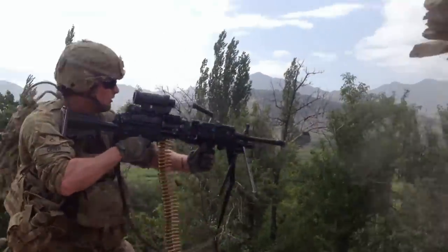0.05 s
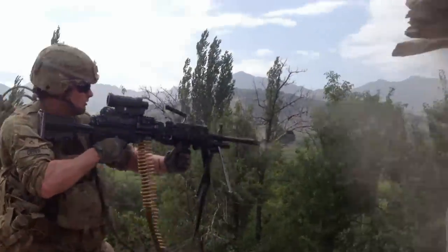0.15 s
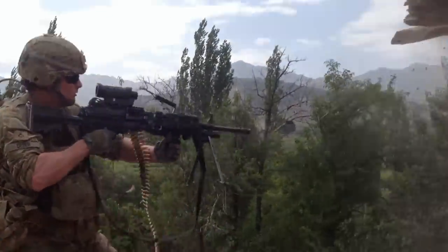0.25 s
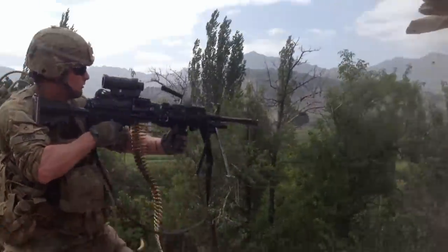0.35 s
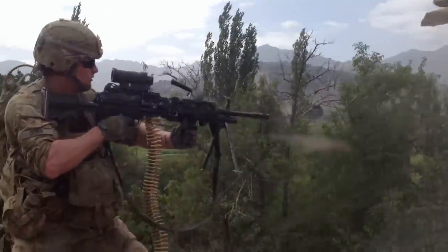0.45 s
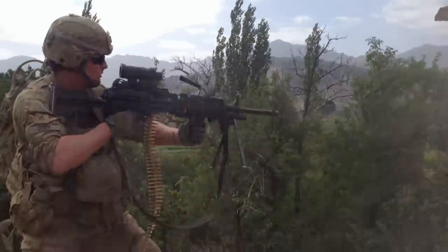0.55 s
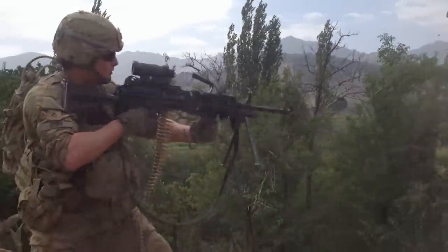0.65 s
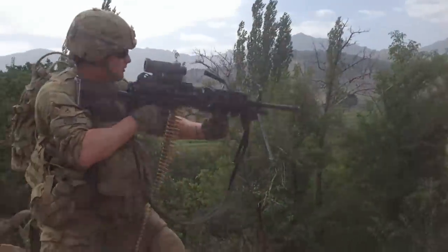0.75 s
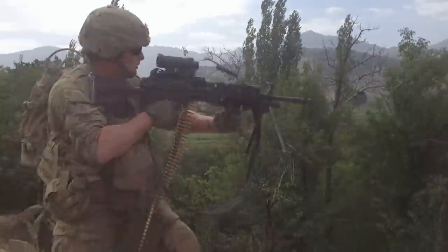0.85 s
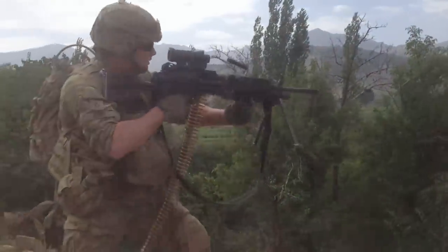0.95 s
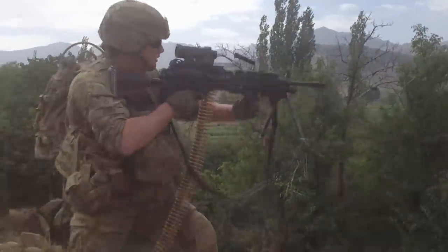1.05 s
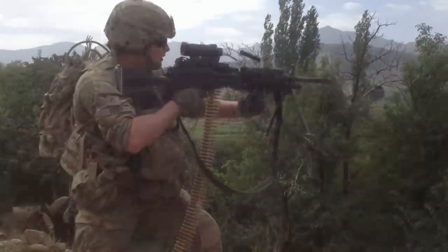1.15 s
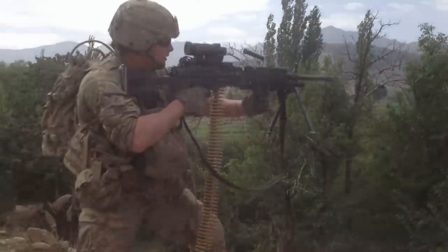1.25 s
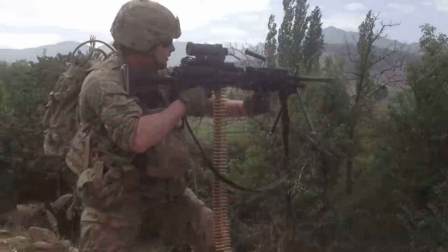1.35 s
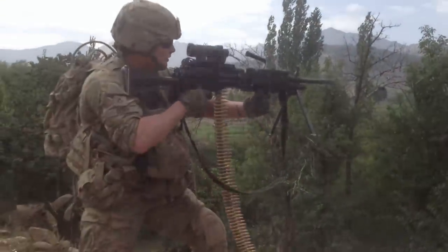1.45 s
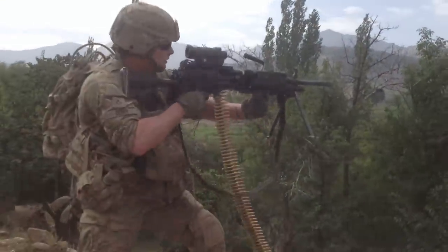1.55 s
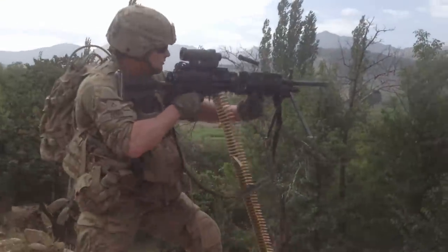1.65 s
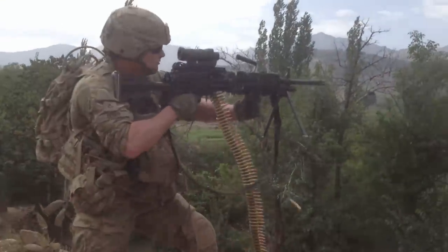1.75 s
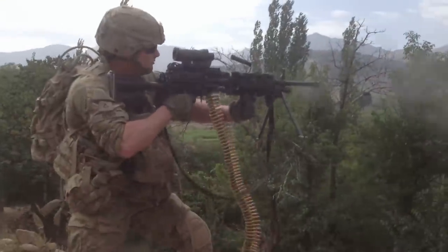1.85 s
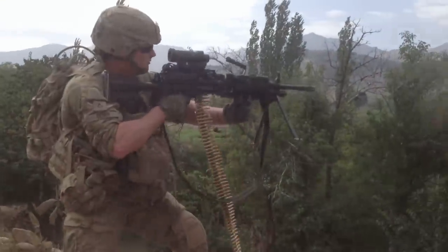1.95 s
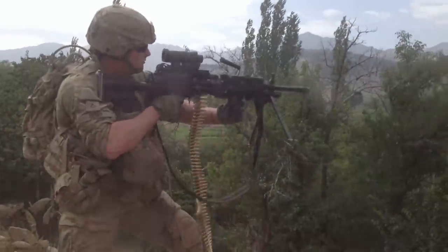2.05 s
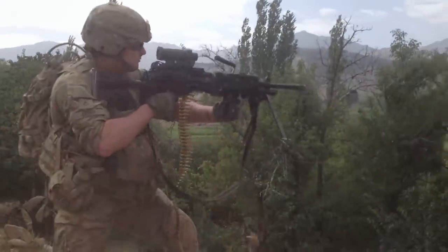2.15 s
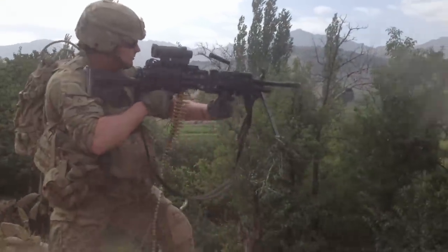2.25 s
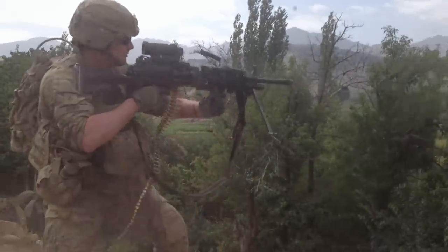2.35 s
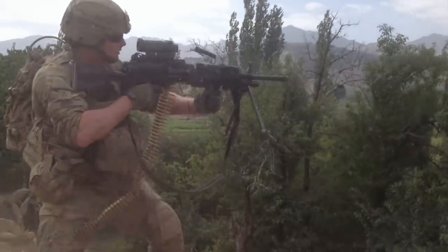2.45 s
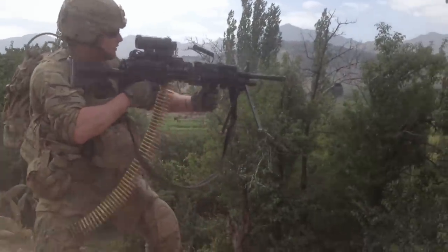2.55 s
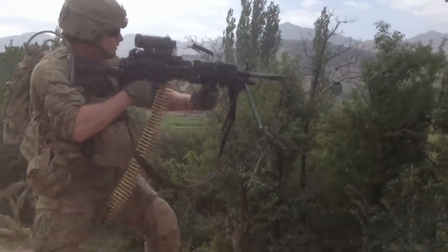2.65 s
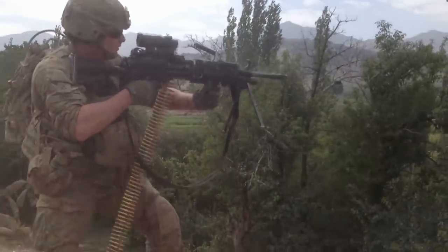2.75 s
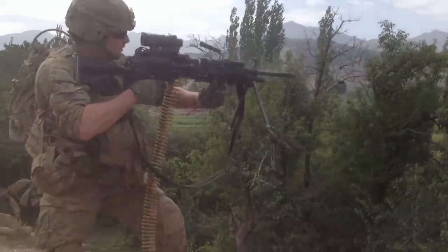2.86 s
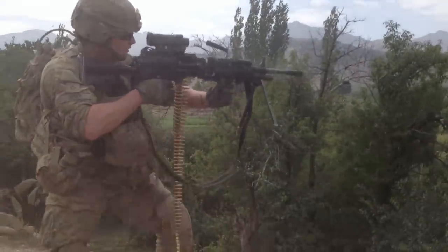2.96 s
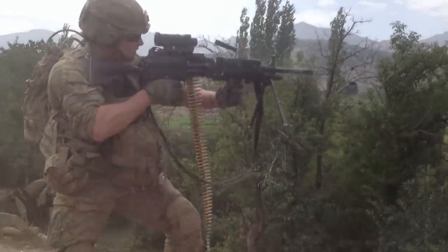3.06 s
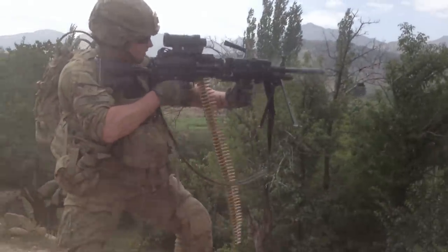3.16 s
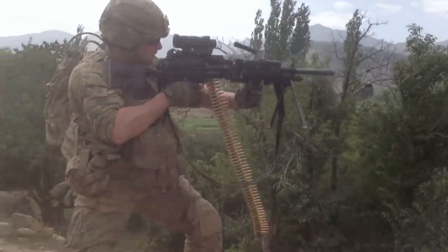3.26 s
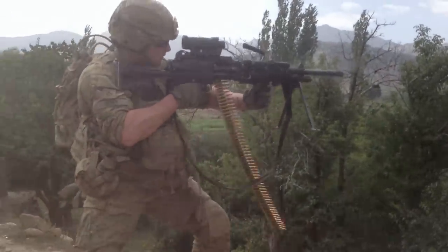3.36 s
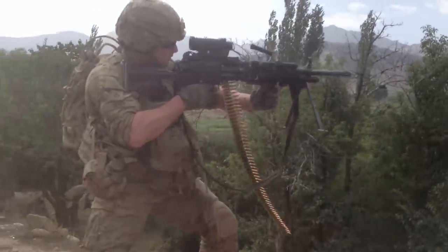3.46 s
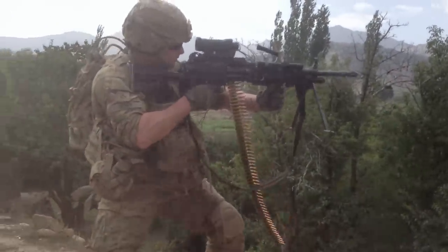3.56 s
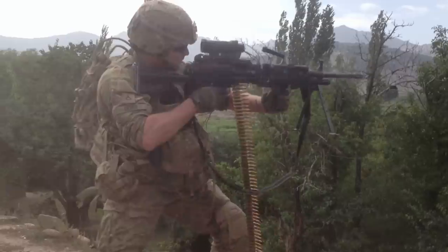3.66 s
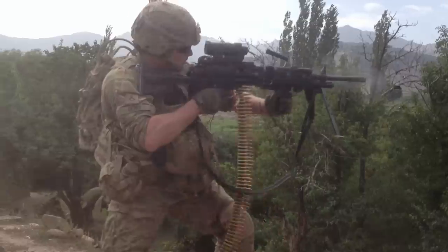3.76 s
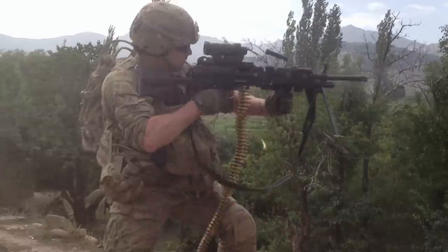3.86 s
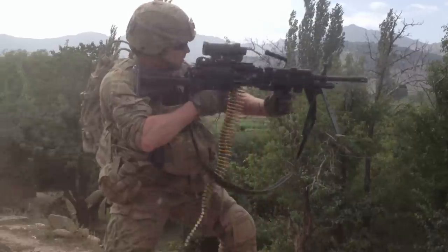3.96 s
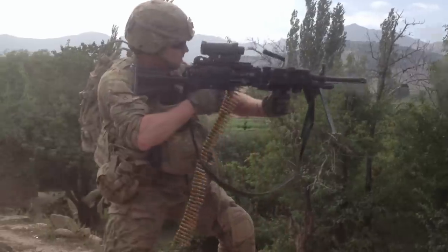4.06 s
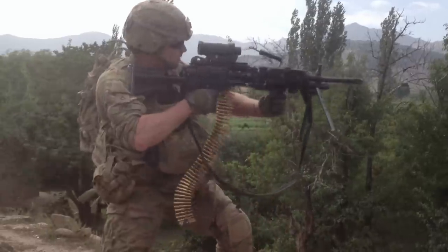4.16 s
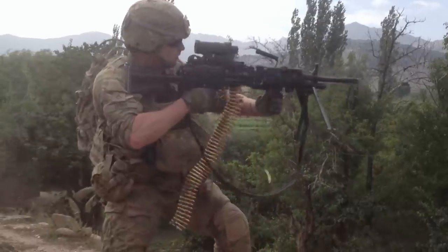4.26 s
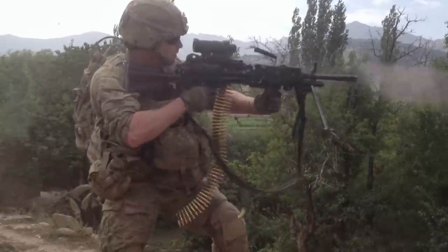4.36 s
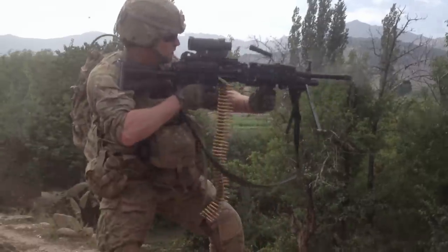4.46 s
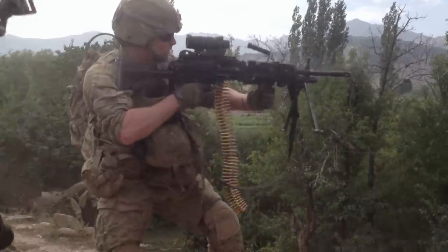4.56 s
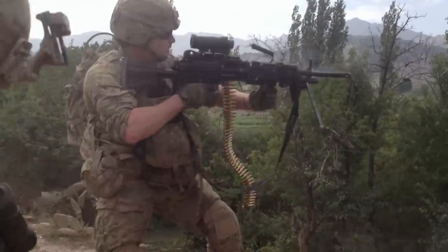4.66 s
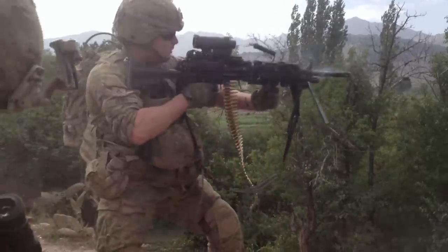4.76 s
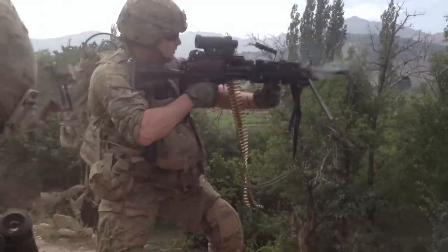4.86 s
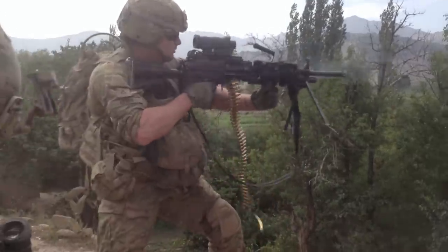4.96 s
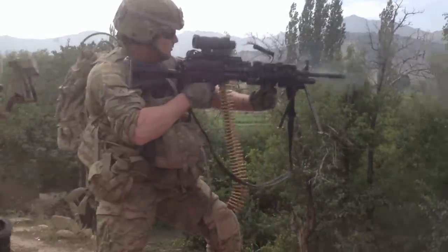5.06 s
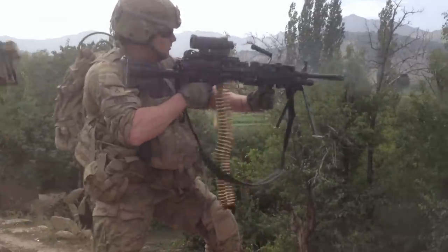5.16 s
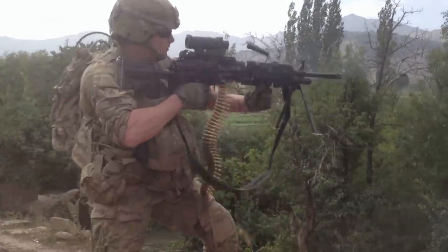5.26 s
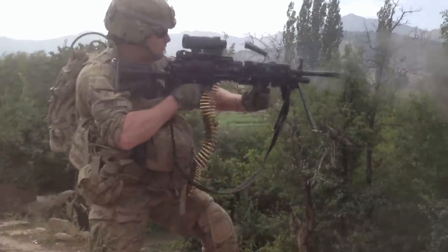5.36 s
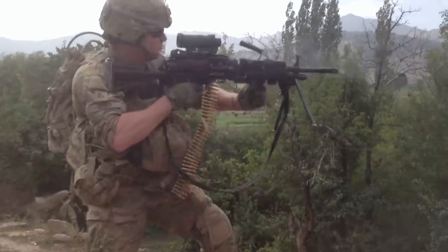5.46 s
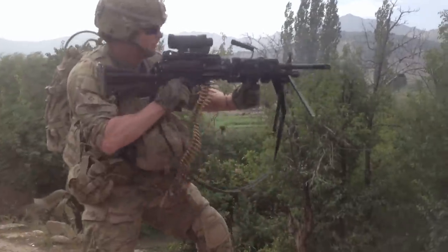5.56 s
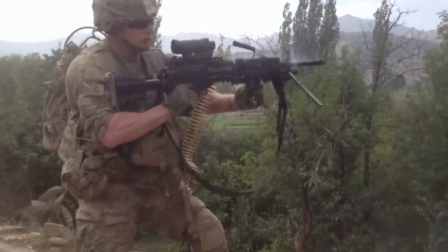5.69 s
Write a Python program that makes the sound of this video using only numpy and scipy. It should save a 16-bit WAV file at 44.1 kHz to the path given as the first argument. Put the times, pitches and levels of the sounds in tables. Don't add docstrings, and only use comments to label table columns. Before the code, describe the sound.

A belt-fed light machine gun fires four loud short bursts close by outdoors, echoes fading over hills while spent brass tinkles on stones.

```python
import sys
import numpy as np
from scipy import signal
from scipy.fft import rfft, irfft, next_fast_len
from scipy.io import wavfile
from scipy.ndimage import uniform_filter1d

SR = 44100
rng = np.random.default_rng(int(sys.argv[2]) if len(sys.argv) > 2 else 0)


def boost_factor(decibels):
    exponent = np.asarray(decibels, float) / 20
    return 10 ** exponent


def generate_wav(sig):
    pcm = np.round(np.clip(np.atleast_2d(sig).T, -1, 1) * 32767).astype(np.int16)
    wavfile.write(sys.argv[1], SR, pcm)


N = 252472
LEAD = .3
LONG = N + round(LEAD * SR)

# [first shot t/s, rounds, cycle at start/ms, at middle/ms, at end/ms]
BURSTS = [
    (-.245, 12, 78.69, 78.59, 78.85),
    (1.7661, 10, 81.27, 79.56, 76.31),
    (3.895, 10, 80.59, 76.75, 79.57),
    (5.055, 9, 77.92, 75.73, 77.49),
]
# [f/Hz, level per Hz/dB]
SIZZLE = [(5500, -58), (7000, -2), (8200, -5), (9800, -9.5), (12000, 0.5), (14800, -2.5), (15400, -7),
          (16000, -50)]


def place(s):
    return round((s + LEAD) * SR)


def add(mix, s, sound):
    part = mix[place(s):][:len(sound)]
    part += sound[:len(part)]


def noise(colour):
    hz, db = np.transpose(colour)
    size = next_fast_len(LONG)
    log_hz = np.log(np.fft.rfftfreq(size, 1 / SR) + 1)
    shape = np.interp(log_hz, np.log(hz), db, -90, -90)
    x = irfft(rfft(rng.standard_normal(size)) * boost_factor(shape), size)[:LONG]
    return x / x.std()


def grit(spread_db, ms):
    size = int(ms * SR / 1000)
    x = uniform_filter1d(uniform_filter1d(rng.standard_normal(LONG), size), size)
    return boost_factor(spread_db * x / x.std())


def shots():
    blast_db, first_shot_db, powder_db = -1.61, -0.8, 1.56
    rows = []
    for first, rounds, *cycle_ms in BURSTS:
        parabola = np.polyfit([0, .5, 1], cycle_ms, 2)
        cycle = np.polyval(parabola, np.linspace(0, 1, rounds - 1)) / 1000
        s = first + np.r_[0, np.cumsum(cycle)]
        rows += zip(s, blast_db + first_shot_db * (s == first) + powder_db * rng.standard_normal(rounds))
    return rows


def gun(rounds):
    # [f/Hz, level per Hz/dB]
    boom = [(40, -55), (100, -28), (130, 5.5), (280, 10), (500, 5.5), (800, 0.5), (1500, -13),
            (3000, -12.5)]
    crack = [(400, -1.5), (900, -4), (1500, -7), (3200, -7.5), (4200, -3.5), (5150, 1), (6200, -6.5),
             (7500, -14), (10000, -27.5)]
    # [peak after the shot t/s, time to fall 60 dB t/s, boom/dB, crack/dB, sizzle/dB]
    scatterers = [(0, 0.2, -22, -3, -14), (.011, 0.063, -13, -2, -37), (.019, .045, -15, -5.5, -41),
                  (.030, 0.016, -34.5, -11, -41), (0.0444, 0.086, -17.5, -9.5, -24.5),
                  (.062, 0.19, -25, -13, -26), (0.072, 0.078, -33, -11, -27), (.095, 0.84, -29.5, -23, -41),
                  (.35, .3, -29, -36, -80), (.3, 1.32, -53, -42.5, -77), (.6, 10, -54, -58.5, -78)]
    dying_share = [1, 1., 0.71]
    same_share = [.45, .1, 0]
    return_s = [.0012, .0068, .0112, .0133, .0178, .0219, .0266, .0295, .032, .0348, .042, .048, .0557,
                .0597, .0631, .0671, .071, .0768, .348, .357]
    return_db = [-9, -13, -13.5, -8.5, -8.5, 0, -13, -18, -6, -4.5, -23, -13.5, -12.5, -15.5, -10.5, -8.5,
                 -15, -15, -29, -31]
    swell_share = .3

    train = np.zeros(LONG)
    for s, db in rounds:
        train[place(s)] = boost_factor(db)
    t = np.arange(round(1.6 * SR)) / SR
    mix = np.zeros(LONG)
    for k, colour in enumerate((boom, crack, SIZZLE)):
        scatter = 0
        for s, t60, *db in scatterers:
            fade = np.where(t < s, (s - t) / swell_share, (t - s) / dying_share[k]) / t60
            scatter = scatter + boost_factor(2 * (db[k] - 60 * fade))
        fresh_power = signal.oaconvolve(train ** 2, scatter)[:LONG] * (1 - same_share[k])
        hiss = noise(colour)
        same_echo = hiss[::-1][:len(t)] * np.sqrt(same_share[k] * scatter)
        mix += signal.oaconvolve(train, same_echo)[:LONG]
        mix += hiss * np.sqrt(abs(fresh_power)) * grit(spread_db=1.5, ms=3.9)

    returns = 0
    for s, db in zip(return_s, return_db):
        pulse_ms = .24 + 8 * s if s < .1 else .5
        u = (t[:SR // 2] - s) * 1000 / pulse_ms
        returns = returns + boost_factor(db) * u * np.exp(.5 - u ** 2 / 2)
    return mix + signal.oaconvolve(train, returns)[:LONG]


def bolt():
    # [release t/s, slide level/dB, swell/dB, slam level/dB]
    slides = [
        (1.706, -24, 1, -7.5),
        (3.835, -21, -1, -8),
        (4.998, -27.5, -2, -19),
    ]
    # [f/Hz, level per Hz/dB]
    rattle = [(180, -75), (300, -45), (700, -23), (975, -17), (3220, -14.5), (4640, -8), (5130, 3.5),
              (9170, -20.5), (14400, -19), (15900, -33)]
    release_s, release_db = .012, -19
    slam_s, overrun_s = .012, .0017
    loudness = np.zeros(LONG)
    for (s, slide_db, swell_db, slam_db), (fire, *_) in zip(slides, BURSTS[1:]):
        at = [s, s + release_s, fire - slam_s - .002, fire - .002]
        db = [slide_db + release_db, slide_db, slide_db + swell_db, slam_db]
        t = np.arange(s, fire + overrun_s, 1 / SR)
        add(loudness, s, boost_factor(np.interp(t, at, db)))
    return loudness * noise(rattle) * grit(spread_db=2.0, ms=1.55)


def far_gun():
    # [t/s, peak level/dB]
    far_shots = [
        (1.4374, -18),
        (1.5506, -18),
        (1.6715, -17.5),
    ]
    # [delay t/s, level/dB]
    echoes = [
        (0, 0),
        (.0015, -6),
        (.0038, -9),
        (.012, -17),
        (.018, -15),
    ]
    # [f/Hz, level/dB, time to fall 60 dB t/s]
    hollow = [(238, -7, .03), (435, -2.5, 0.033), (895, -9, 0.059), (2050, -17, .025), (2610, -19, 0.037)]
    t = np.arange(2000) / SR
    blast = (1 - t / .0003) * np.exp(-t / .0003)
    for hz, db, t60 in hollow:
        blast = blast + boost_factor(db - 60 * t / t60) * np.cos(2 * np.pi * hz * t)
    blast = signal.lfilter(*signal.butter(3, 3800, fs=SR), blast)
    mix = np.zeros(LONG)
    for s, db in far_shots:
        for late, echo_db in echoes:
            add(mix, s + late, boost_factor(db - 6.5 + echo_db) * blast)
    return mix


def brass():
    # [t/s, tick level/dB, share of thin hiss 0-1]
    ticks = [(1.030, -17, 0), (1.1159, -15, 0.1), (1.3564, -36, .5), (1.6885, -19, .3), (2.8388, -30, .4),
             (3.0088, -20, 0.1), (3.0735, -16, .2), (3.245, -35, .5), (3.3129, -20, .3), (3.5250, -11, 0),
             (3.5350, -19, 0), (3.5933, -13.5, .15), (3.6055, -20, .1), (3.748, -26, 0.4)]
    # [f/Hz, level per Hz/dB]
    stone = [(1200, -40), (2500, -13), (4500, -9), (5600, 11), (7500, -13), (9500, -22), (15500, -22)]
    # [f/Hz, level/dB, time to fall 60 dB t/s, beat f/Hz]
    case_modes = [(3830, -7, 0.97, 12.3), (4040, 4.5, 0.56, 22.4), (4945, 5, .4, 25),
                  (5680, -0.5, 0.85, 28.5), (6960, -14, 0.97, 15.3), (8200, -14, 0.72, 22),
                  (9300, -21, 1, 33), (10530, -6, 1, 28.7), (14280, -13, .35, 15)]
    # [f/Hz, level/dB, time to fall 60 dB t/s, beat f/Hz]
    link_modes = [(9720, -3.5, 0.23, 32), (12600, -6, 0.43, 35), (14700, -2.5, 0.42, 52)]
    # [t/s, level/dB, struck f/Hz, reach/octaves]
    case_landings = [(.915, -46, 9300, 0.25), (1.035, -39.5, 5700, .08), (1.05, -48, 3950, .05),
                     (1.083, -46, 4060, .05), (1.106, -42.5, 4060, 0.054), (1.12, -49, 10800, .08),
                     (1.146, -37.5, 5690, 0.19), (1.15, -39, 3830, .03), (1.2, -45, 7117, 0.16),
                     (1.29, -49, 5000, 0.09), (1.356, -39, 9480, 0.11), (1.357, -40, 5674, .08),
                     (1.5, -42, 5674, 0.069), (1.611, -41, 14300, 0.11), (2.87, -57, 10589, .08),
                     (3.008, -45, 5700, .1), (3.012, -42.5, 3830, .04), (3.02, -48.5, 4040, .04),
                     (3.085, -41, 5680, .08), (3.008, -44.5, 10640, 0.13), (3.32, -44, 7010, 0.99),
                     (3.42, -46, 14250, .1), (3.46, -47.5, 4040, .05), (3.40, -49, 4960, .05),
                     (3.46, -41, 7068, .08), (3.55, -45, 5680, .08), (3.608, -58, 4000, .05),
                     (4.82, -56, 10620, .08)]
    # [t/s, level/dB, struck f/Hz, reach/octaves]
    link_landings = [(.79, -40, 12645, .6), (.96, -55, 14556, .1), (1.12, -52, 12600, .6),
                     (1.4, -60, 12700, .3), (2.66, -47, 10000, .1), (2.659, -53, 12700, .1),
                     (2.842, -52, 9800, .1), (2.842, -49, 12600, .1), (2.824, -50, 14700, .1),
                     (3.008, -50, 14691, .2), (3.075, -48, 14691, .1), (3.118, -45, 12400, 0.4),
                     (3.242, -51, 12715, .1), (3.524, -39, 14600, .1), (3.533, -42, 12414, 0.4),
                     (3.592, -43, 14800, .1), (3.605, -42, 9520, .1), (3.748, -44, 12450, 0.45),
                     (4.75, -52, 15100, .1), (4.829, -57, 12650, 0.035)]

    mix, full, thin = np.zeros(LONG), noise(stone), noise(SIZZLE)
    t = np.arange(900) / SR
    for s, db, share in ticks:
        hiss = (1 - share) * full[place(s):][:900] + share * thin[place(s):][:900]
        add(mix, s, boost_factor(db - 13.5 - 60 * t / .011) * hiss)

    for modes, landings in ((case_modes, case_landings), (link_modes, link_landings)):
        for s, db, near_hz, reach in landings:
            nearest_hz = min((mode[0] for mode in modes), key=lambda hz: abs(hz - near_hz))
            ratio = near_hz / nearest_hz
            for hz, mode_db, t60, beat_hz in modes:
                missed_db = -6 * (np.log2(hz * ratio / near_hz) / reach) ** 2
                if missed_db > -24:
                    t = np.arange(round(min(.6, .7 * t60) * SR)) / SR
                    pair = np.sin(2 * np.pi * hz * ratio * t)
                    pair = pair + 0.53 * np.sin(2 * np.pi * (hz * ratio - beat_hz) * t)
                    fade = boost_factor(db + mode_db + missed_db - 60 * t / t60)
                    add(mix, s, fade * pair * np.minimum(t / .0038, 1))
    return mix


def tumble(rounds):
    case_hz = [4050, 4945, 5670, 7090, 8255, 9300, 10640, 14270]
    link_hz = [9700, 12600, 14500, 15280]
    mix, t = np.zeros(LONG), np.arange(SR // 3) / SR
    chance = rng.random((len(rounds), 5, 5))
    for (shot, _), bounces in zip(rounds, chance):
        for late, kind, mode, size, dent in bounces:
            pitches = case_hz if kind < .45 else link_hz
            hz = pitches[int(mode * len(pitches))] * (1 + .014 * (dent - .5))
            fall = .063 + .9 * late ** 1.6
            fade = boost_factor(-56 - 14 * size - 9 * fall - 60 * t / .82)
            add(mix, shot + fall, fade * np.sin(2 * np.pi * hz * t))
    return mix


def breeze():
    # [t/s, half-length t/s, level/dB]
    low_swells = [
        (0.888, .13, -54),
        (1.434, .03, -62),
        (1.572, .025, -60),
        (1.695, 0.064, -60),
        (2.751, .12, -55),
        (3.1, .08, -70),
        (3.36, 0.087, -56),
        (3.62, 0.088, -64),
        (4.82, .12, -54),
    ]
    t = np.arange(LONG) / SR - LEAD
    loudness = sum(boost_factor(db) * np.exp(-((t - s) / half) ** 2) for s, half, db in low_swells)
    rumble = noise([(25, -16), (60, -16), (110, 4), (200, -23)])
    return loudness * rumble * grit(spread_db=3.0, ms=39.0)


def hillside_air():
    # [f/Hz, level per Hz/dB]
    air_colour = [(29, -51), (50, -25), (162, -2.5), (479, -2.5), (595, -25), (1220, -9.5), (2970, -14.5),
                  (5460, -20), (7900, -45), (9000, -19), (11700, -53), (19800, -120)]
    return boost_factor(-51) * noise(air_colour) * grit(spread_db=1.0, ms=56.0)


def scene():
    rounds = shots()
    metal = (brass() + tumble(rounds)) * grit(spread_db=2.5, ms=5.3)
    loud_guns = signal.filtfilt(*signal.butter(2, 100, "high", fs=SR), gun(rounds) + far_gun())
    return (loud_guns + bolt() + metal + breeze() + hillside_air())[None, -N:]


def top_cut(x):
    return signal.sosfilt(signal.butter(12, 16010, fs=SR, output="sos"), x)


def record(dry):
    # [f/Hz, level/dB]
    mute = [(5000, -110), (7000, -90), (9000, -85.5), (15500, -102)]
    ceiling, knee = .9, 3.0
    x = dry / (1 + abs(dry / ceiling) ** knee) ** (1 / knee)
    load = uniform_filter1d(uniform_filter1d(x ** 2, 340), 340)
    quick_sag = 0.32 * signal.lfilter(*signal.butter(1, 13., "high", fs=SR), load)
    slow_sag = 0.053 * uniform_filter1d(load, 6000)
    x = x - quick_sag - slow_sag

    hz, _, z = signal.stft(x, SR, nperseg=1024)
    band_db = 10 * np.log10(uniform_filter1d(abs(z) ** 2, size=9, axis=1) + 1e-20)
    patches = uniform_filter1d(rng.standard_normal((65, z.shape[2])), size=9)
    patches = np.repeat(patches, 8, axis=0)[:len(hz)]
    over_db = band_db - np.interp(hz, *np.transpose(mute))[:, None] + 39.0 * patches
    edge = 1 / (1 + np.exp(np.clip((hz - 15450) / 110, -50, 50)))
    kept = z * np.clip(over_db / 2.7, 0, 1) * edge[:, None]
    x = signal.istft(kept, SR, nperseg=1024)[1][:, :N]
    return top_cut(x)


dry = scene()
out = record(dry)
generate_wav(out)
```